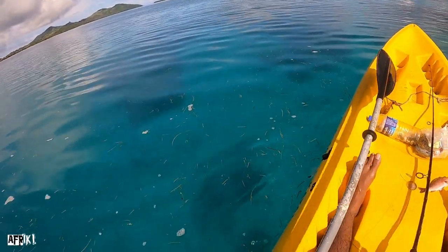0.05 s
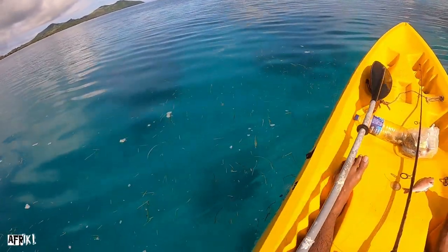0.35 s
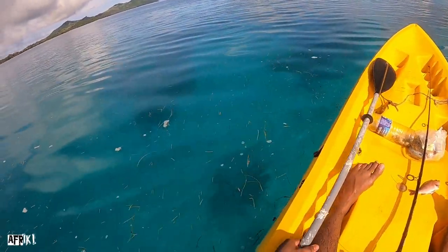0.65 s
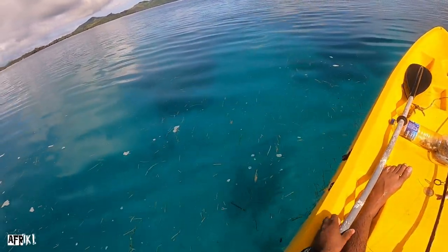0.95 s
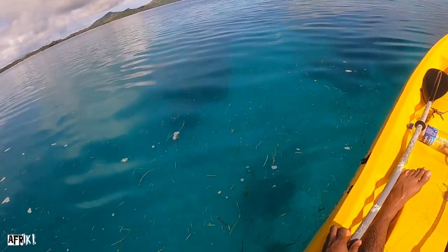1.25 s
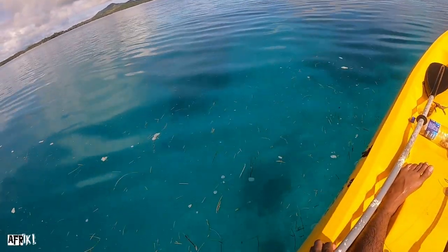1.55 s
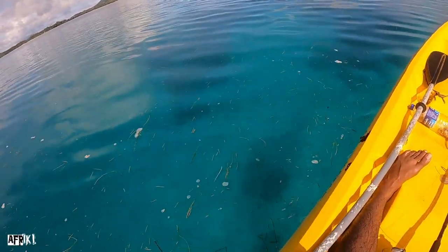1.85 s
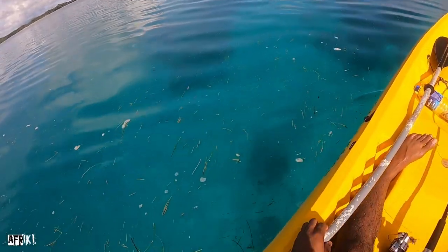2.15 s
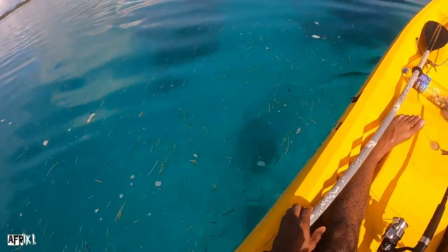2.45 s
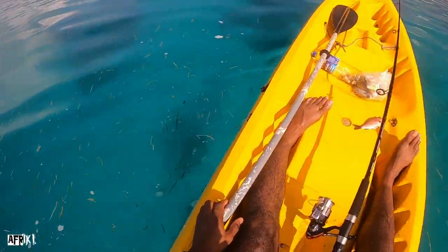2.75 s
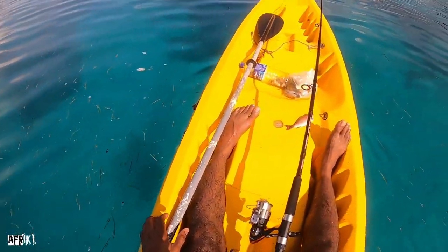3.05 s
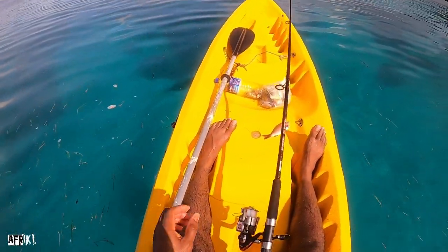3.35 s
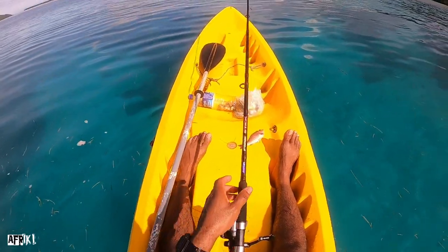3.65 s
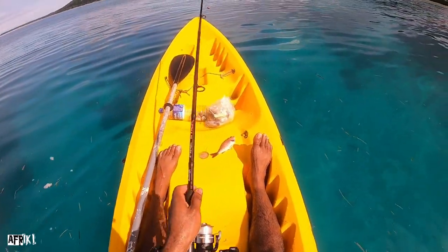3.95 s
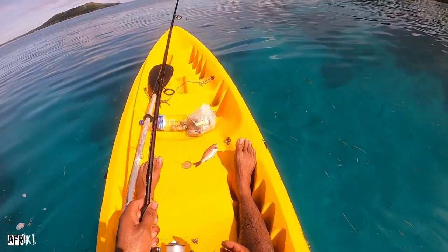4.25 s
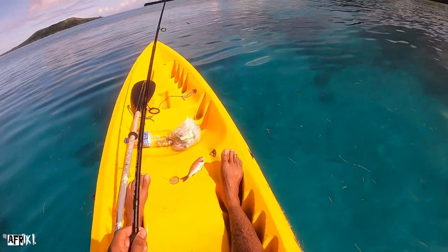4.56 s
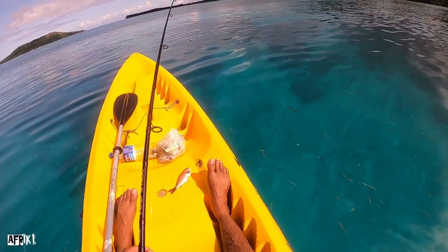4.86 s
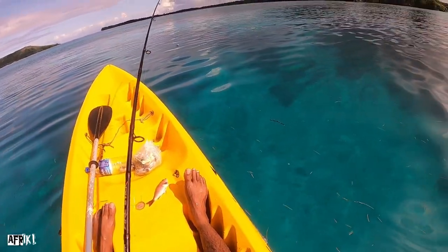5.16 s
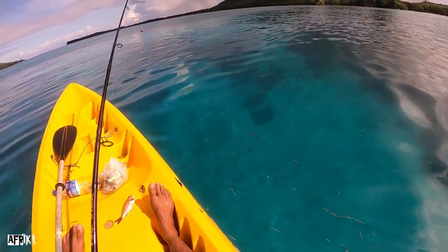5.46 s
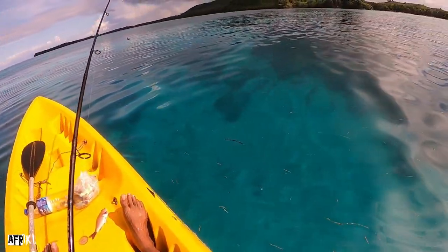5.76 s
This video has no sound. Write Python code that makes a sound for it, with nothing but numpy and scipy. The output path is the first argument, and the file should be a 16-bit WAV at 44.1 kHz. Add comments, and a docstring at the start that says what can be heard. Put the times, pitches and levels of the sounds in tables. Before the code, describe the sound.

A paddle thumps and scrapes on a hollow plastic kayak, then a fishing rod is handled with light clicks over a faint hum.

```python
"""Hollow thumps, scrapes and clicks: a paddle is laid down in a plastic kayak, then a rod is picked up.
Blows make the hull ring, and the paddle catches and slips as it slides. Small ticks, rustle and clinks
of the fishing reel follow, over a faint far hum and light air on calm water.
A worn action camera hears it all. Its right port (microphone opening) honks near 750 Hz and loses
the treble, as a wet port does."""
import sys
import numpy as np
from scipy import signal
from scipy.fft import rfft, irfft, next_fast_len
from scipy.io import wavfile

SR = 44100
rng = np.random.default_rng(int(sys.argv[2]) if len(sys.argv) > 2 else 0)


def dump(signal):
    """Clip the signal to [-1, 1] and save it as 16-bit WAV at the path in sys.argv[1]."""
    limited = np.clip(np.atleast_2d(signal).T, -1, 1)
    pcm = np.round(limited * 32767).astype(np.int16)
    wavfile.write(sys.argv[1], SR, pcm)


N = 260190
T = np.arange(N) / SR

# The hull's modes, the tones it rings with when struck.
# Each row: pitch in Hz, level in dB, t60 (the time to fade by 60 dB) in seconds.
HULL_MODES = [(45.5, 4.5, 1), (61.05, 0, 0.49), (85.8, -5, 0.41), (99.3, -2, 0.31), (128.5, -6, 0.32),
              (155.5, -5.5, 0.16), (189, -5, 0.095), (228.2, -2.5, 0.088), (262.5, -15.5, 0.25),
              (310.5, -11.5, 0.21), (342.5, -11.5, 0.13), (411.4, -7.5, 0.073), (528, -0.5, 0.042),
              (599, -2.5, 0.068), (673.4, -8, 0.1), (795, -3.5, 0.08), (858, -4, 0.078), (997, -4.5, 0.061),
              (1240, -11.5, 0.082), (1770, -2, 0.035)]
# The tone of rubbing. Each row: frequency in Hz, then level in dB for scrape, judder and rustle.
RUBBING_TONE = [(30, 10.5, -5, -4.5), (74.6, 8.5, -8.5, -13.5), (158, 1.5, 6, -7), (316, -0.5, -3, 6),
                (550, -2, -3, -0.5), (920, -9.5, -27, 2.5), (1730, -14.5, -38, 3), (3230, -21.5, -38, -8),
                (4280, -26.5, -49.5, -12.5), (6740, -39.5, -67, -17.5), (10400, -50.5, -55, -34),
                (16000, -72, -83.5, -50)]
# Movements of hands, clothes and line.
# Each row: start in seconds, length in seconds, level in dB, growth along the way in dB.
HAND_MOVES = [(.01, 0.0063, -43, -15.5), (.27, 0.15, -49, -19.5), (.54, 0.061, -36, 2.5),
              (.76, 0.065, -40, 1.5), (1.81, 0.06, -46.5, -1.5), (1.93, 0.21, -48.5, 5),
              (2.87, 0.18, -48.5, -4), (3.23, 0.024, -42.5, 8.5), (3.56, 0.018, -45, 3.5),
              (3.68, 0.64, -46, 1.5), (3.965, 0.05, -39.5, -0.5), (4.16, 0.092, -42, -5),
              (4.41, 0.0085, -44, 2.5), (4.59, 0.18, -48.5, -2.5), (5.03, 0.2, -45.5, 4),
              (5.4, 0.065, -41.5, -4), (5.5, 0.071, -46, 5), (5.64, 0.044, -42.5, 2.5),
              (5.8, 0.092, -50.5, 8)]


def amp(db):
    """Turn decibels into a gain."""
    return 10 ** (np.asarray(db) / 20)


def unit(x):
    """Scale a sound so that its average level (rms) is 1."""
    return x / np.sqrt(np.mean(x ** 2) + 1e-20)


def unit_hit(x):
    """Scale a hit so that its first 10 ms have an average level of 1."""
    return x / np.sqrt(np.mean(x[:SR // 100] ** 2) + 1e-20)


def on_octaves(hz, points_hz, values):
    """Join points by straight lines, with every octave equally wide."""
    return np.interp(np.log(np.maximum(hz, 1)), np.log(points_hz), values)


def colour(x, points, size=2048):
    """Shape a sound's tone to follow an outline of (Hz, dB) points."""
    db = on_octaves(np.arange(size // 2 + 1) * SR / size, *np.transpose(points))
    cepstrum = irfft(np.log(amp(db)))
    cepstrum[1:size // 2] *= 2  # folded so that the filter rings only after a hit, never before
    cepstrum[size // 2 + 1:] = 0
    return signal.fftconvolve(x, irfft(np.exp(rfft(cepstrum))))[:len(x)]


def resonant(hz, db, peaks):
    """A tone outline with peaks added. Each peak: pitch in Hz, width in Hz, height in dB."""
    fine_hz = np.geomspace(30, 16000, 600)
    lift = sum(height / (1 + (2 * (fine_hz - f) / width) ** 2) for f, width, height in peaks)
    return np.c_[fine_hz, on_octaves(fine_hz, hz, db) + lift]


def band(hz, width_hz):
    """Noise gathered around one pitch."""
    offset = (np.arange(N // 2 + 1) * SR / N - hz) / width_hz
    return unit(irfft(rfft(rng.standard_normal(N)) / (1 + (2 * offset) ** 2), N))


def waver(spread_db, rate_hz):
    """A gain that wanders up and down at random."""
    return amp(spread_db * band(0, rate_hz))


def fade(t60, count):
    """A gain, count samples long, that falls by 60 dB every t60 seconds."""
    return np.exp(-np.log(1000) * T[:count] / t60)


def burst(t60, count):
    """Noise that starts at once and dies away."""
    return rng.standard_normal(count) * fade(t60, count)


def ring(hz, db, t60, count):
    """The fading tones of a struck object, added together."""
    return sum(amp(level) * fade(life, count) * np.sin(2 * np.pi * f * T[:count])
               for f, level, life in zip(hz, db, t60))


def add(out, start_s, sound):
    """Mix a sound in at the given time."""
    start = max(int(start_s * SR), 0)
    out[start:start + len(sound)] += sound[:max(N - start, 0)]


def slips(per_second, spread_db):
    """Surfaces stick and slip, giving uneven pulses at random moments."""
    size = amp(spread_db * np.clip(rng.standard_normal(N), -2, 2))
    return unit((rng.random(N) < per_second / SR) * size * rng.choice([-1, 1], N))


def stroke(start_s, length_s, attack_s, release_s, growth_db=0):
    """The gain of one movement: it builds up to start_s, holds while growing or easing, then fades."""
    progress = np.clip((T - start_s) / max(length_s, 1e-3), 0, 1)
    before = np.maximum(start_s - T, 0) / attack_s
    after = np.maximum(T - start_s - length_s, 0) / release_s
    return amp(growth_db * (progress - .5)) * np.exp(-before - after)


def strokes(rows, attack_s, release_s):
    """The gain of a whole table of movements."""
    return np.sqrt(sum((amp(db) * stroke(start_s, length_s, attack_s, release_s, growth_db)) ** 2
                       for start_s, length_s, db, growth_db in rows))


def rod_in_hand():
    """A gain that rises as the rod is picked up and stays up to the end."""
    return stroke(start_s=3.33, length_s=N / SR, attack_s=0.17, release_s=.2)


def hum_and_air(air_db=-42.5):
    """A wavering low hum carries across the water under soft air noise."""
    # The far hum. Each row: pitch in Hz, width in Hz, level in dB.
    hum_bands = [(144, 19.7, -46.5), (187.3, 18, -48.5), (225.8, 3, -50), (276.6, 12.6, -47.5)]
    # The tone of open air. Each row: frequency in Hz, level in dB.
    air_tone = [(25, 13.5), (80, -9), (150, -0.5), (320, 0), (500, -12.5), (1000, -16), (2500, -20),
                (5000, -28.5), (8000, -39), (12000, -52.5), (16000, -64.5)]
    hum = sum(amp(db) * band(hz, width_hz) for hz, width_hz, db in hum_bands)
    air = unit(colour(rng.standard_normal(N), air_tone)) * waver(spread_db=2, rate_hz=3.6)
    return hum + amp(air_db) * air


def breeze(shared=0.63, attack_s=0.017, release_s=0.031):
    """Puffs of air rumble on the two ports as the head turns, partly alike on both sides."""
    # Each row: start in seconds, length in seconds, left level in dB, right level in dB.
    puffs = [(0.026, 0.13, -15.5, -38), (0.524, 0.69, -42, -43), (1.193, 0.13, -41, -39),
             (1.46, 0.077, -38, -48), (2.06, 0.052, -36, -46), (2.574, 0.3, -30, -30.5),
             (3.216, 0.01, -49, -33.5), (3.418, 0.013, -31, -43), (3.607, 0.029, -39.5, -58),
             (3.882, 0.019, -31.5, -39), (4.004, 0.017, -42, -18), (4.106, 0.008, -36, -26),
             (4.195, .015, -49, -19), (4.595, 0.016, -38, -26), (4.728, 0.016, -54, -34),
             (5.152, 0.12, -38, -37), (5.36, 0.017, -30, -22.5), (5.636, 0.32, -35.5, -27.5)]
    rumble_tone = [(12, -8), (32, 10), (60, -1), (100, -10), (200, -19.5), (600, -83.5)]
    common, left, right = (unit(colour(rng.standard_normal(N), rumble_tone)) for _ in range(3))
    gusts = sum(amp([[left_db], [right_db]]) * stroke(start_s, length_s, attack_s, release_s)
                for start_s, length_s, left_db, right_db in puffs)
    return np.array([unit(left + shared * common), unit(right + shared * common)]) * gusts


def rustle(idle_db=-54):
    """Hands, clothes and line rub in fine slips that never quite stop once the rod is held."""
    hz, _, _, rustle_db = np.transpose(RUBBING_TONE)
    fibres = slips(per_second=5000, spread_db=3) * waver(spread_db=2.2, rate_hz=44)
    moving = strokes(HAND_MOVES, attack_s=0.048, release_s=0.03)
    return unit(colour(fibres, np.c_[hz, rustle_db])) * np.hypot(moving, amp(idle_db) * rod_in_hand())


def crackles(moving_db=-11, idle_db=-62.5):
    """Line, reel and rod give dry crackles in uneven bunches, stronger while the hands move."""
    out = np.zeros(N)
    for when, pitch, force in rng.random((520, 3)):
        hz = 1700 * 4 ** pitch
        tone = [(500, -16), (hz / 1.5, -7), (hz, 0), (8000, -15), (11000, -33), (16000, -54)]
        click = colour(burst(t60=.014, count=1200), tone, size=256)
        add(out, when * N / SR, amp(12 * force ** 2) * click)
    moving = amp(moving_db) * strokes(HAND_MOVES, attack_s=0.093, release_s=0.042)
    handling = np.hypot(moving, amp(idle_db) * rod_in_hand())
    return unit(out * waver(spread_db=3, rate_hz=14)) * handling


def reel_clinks(chatter_t60=0.008, count=4000):
    """Loose metal parts of the reel chatter for a moment and ring briefly."""
    # Each row: start in seconds, level in dB.
    clinks = [(5.403, -35.5), (5.412, -38), (5.43, -46.5), (5.448, -49), (5.468, -67.5), (5.56, -50),
              (5.594, -52), (5.631, -46.5), (5.68, -45.5)]
    # The reel's ring. Each row: pitch in Hz, level in dB, fade time in seconds.
    reel_modes = [(2100, -1, 0.022), (3150, 3, 0.0185), (3750, 4, .014), (4050, 9, 0.022), (4380, -3, 0.02),
                  (4800, -2, 0.025), (5800, -11, 0.017), (7060, -6, 0.02), (8800, -25, .012)]
    out = np.zeros(N)
    metal = ring(*np.transpose(reel_modes), count)
    for start_s, level_db in clinks:
        clink = signal.fftconvolve(burst(chatter_t60, count), metal)
        add(out, start_s, amp(level_db) * unit_hit(clink))
    return out


def ticks(click_t60=0.03, rise_s=0.00074, ring_cycles=27, count=3500):
    """Blade, rod and line tap lightly: a click and four short tones, of which the lowest lasts longest."""
    # Each row: start in seconds, click in dB, ring in dB, pitch in Hz, brightness in dB per octave.
    taps = [(.344, -41, -43, 2150, 3), (.409, -40.5, -41.5, 2260, -0.5), (.602, -42.5, -20.5, 894, 2.5),
            (.626, -33.5, -25.5, 870, -4.5), (.7415, -31.5, -33, 2760, 6), (0.7737, -34.5, -26, 1440, 2),
            (0.7891, -36, -18.5, 1096, -12), (.829, -36.5, -24, 1240, -5.5), (0.868, -57, -24, 1285, -6),
            (.946, -39, -20, 1680, 4), (1.005, -46.5, -21.5, 870, -3.5), (1.021, -39, -18.5, 823, -1),
            (1.062, -40.5, -34, 890, -2.5), (1.551, -38, -32.5, 2550, -5), (1.841, -46.5, -42, 2470, -2),
            (1.849, -46, -47.5, 3400, 10.5), (1.996, -49.5, -53, 2720, 2.5), (2.425, -61, -40, 1270, -8),
            (2.456, -53.5, -41.5, 1180, 9.5), (2.597, -50.5, -49, 3500, 2),
            (2.642, -45.5, -36.5, 2470, 4.5), (2.887, -55.5, -33.5, 1260, 9), (3.008, -38, -48.5, 1560, 0),
            (3.182, -44.5, -52, 2730, 7.5), (3.517, -42.5, -31.5, 630, 6.5), (3.543, -39, -37.5, 3280, -1),
            (3.694, -36, -32, 3100, 1.5), (3.705, -37.5, -39.5, 2160, 2), (3.78, -35, -37, 1610, 0.5),
            (3.843, -51, -48, 3020, 1.5), (3.864, -37, -33, 2990, -1.5), (3.908, -52, -53, 1690, 12),
            (3.935, -49, -54, 1540, 4.5), (3.947, -37.5, -45, 1580, 1.5), (4.024, -36.5, -29.5, 1990, 7),
            (4.139, -42.5, -41, 1850, 1), (4.19, -30, -41.5, 1580, -5.5), (4.231, -39, -49, 1790, 0.5),
            (4.427, -42.5, -41, 1830, -1.5), (4.632, -48.5, -47, 1700, 6), (4.679, -41, -40, 1260, 2.5),
            (4.722, -45, -47, 1830, -4), (4.734, -35, -50, 2770, 2), (4.796, -44.5, -45, 1690, 2.5),
            (4.909, -43, -36.5, 1870, 0), (5.015, -52, -45, 1930, 8), (5.032, -38, -45.5, 1570, -3),
            (5.065, -46, -54, 1830, -3), (5.18, -34, -44.5, 1870, -9.5), (5.224, -53.5, -49, 7200, 4),
            (5.251, -38.5, -31.5, 1880, -5.5), (5.391, -48.5, -37, 1820, -7), (5.409, -31, -42, 1500, -0.5),
            (5.494, -40, -47, 1960, -3), (5.531, -48, -46.5, 1520, 8), (5.55, -40, -44, 3230, 7),
            (5.645, -36.5, -36, 2000, 7.5), (5.658, -39, -40, 2940, 4), (5.678, -47, -42, 1930, 9)]
    tone_hz, tone_db = np.transpose([(200, -9), (900, 17), (3000, 12.5), (7500, -5.5),
                                     (11000, -28), (16000, -37)])
    rise = 1 - np.exp(-T[:count] / rise_s)
    out = np.zeros(N)
    for start_s, click_db, ring_db, hz, brightness in taps:
        tone = np.c_[tone_hz, tone_db + brightness * np.log2(tone_hz / 2000)]
        click = colour(burst(click_t60, count), tone)
        mode_hz = hz * np.array([1, 1.13, 1.41, 1.73])
        ringing = rise * ring(mode_hz, [4.5, -3.5, -6, -7.5], ring_cycles / mode_hz, count)
        add(out, start_s, amp(click_db) * unit_hit(click) + amp(ring_db) * unit_hit(ringing))
    return out


def scratches(low_hz=998, high_hz=3140, ring_cycles=37):
    """A hard edge bites into the plastic and tears along in tiny grains, each with its own pitch."""
    # Each row: start in seconds, length in seconds, level in dB, growth along the way in dB.
    bites = [(.488, 0.017, -24.5, 0.5), (.532, 0.044, -25, -2), (.56, 0.078, -31.5, -1),
             (.741, 0.0033, -25.5, 3), (.83, 0.23, -43, -11), (.928, 0.016, -32.5, 0),
             (1.55, .06, -41.5, -18), (2.042, 0.033, -49.5, 10), (2.1, 0.045, -39, 1.5),
             (2.45, 0.34, -54, -7)]
    grains = np.zeros(N)
    for when, pitch, force in rng.random((3200, 3)):
        hz = low_hz * (high_hz / low_hz) ** pitch
        add(grains, when * N / SR, ring([hz], [force ** 2], [ring_cycles / hz], count=500))
    tone = [(300, -19.5), (1000, 0.5), (7500, 1), (10000, -5.5), (16000, -19)]
    return unit(colour(grains, tone)) * strokes(bites, attack_s=0.0011, release_s=0.0021)


def scrapes():
    """The paddle slides along the rim, catching and letting go in fast slips that make both ring."""
    # Each row: start in seconds, length in seconds, level in dB, growth along the way in dB.
    slides = [(.01, 0.043, -32, 0.5), (.12, 0.12, -39, 6), (.492, 0.005, -22, -4.5),
              (.534, 0.088, -22.5, -3), (.743, 0.016, -25, -6), (.838, 0.17, -30.5, -6.5),
              (.955, 0.079, -25, -7), (1.06, 0.056, -39.5, 8.5), (1.36, 0.24, -37.5, -1.5),
              (1.55, 0.14, -34.5, -18.5), (2.03, 0.12, -25.5, 9), (2.19, 0.023, -35, 9)]
    # Where blade and rim ring. Each row: pitch in Hz, width in Hz, height in dB.
    blade_peaks = [(348, 130, 4.5), (650, 64, -0.5), (875, 97, 8.5), (1250, 9.6, 11), (1673, 110, 9),
                   (2340, 44, 16.5), (2750, 240, 6.5), (2996, 180, 6.5)]
    hz, scrape_db, _, _ = np.transpose(RUBBING_TONE)
    grit = slips(per_second=2400, spread_db=2.5) * waver(spread_db=1, rate_hz=28)
    scraping = unit(colour(grit, resonant(hz, scrape_db, blade_peaks)))
    return scraping * strokes(slides, attack_s=0.0056, release_s=0.028)


def judders(peak_width_hz=10.7, peak_db=11):
    """A leaning hand shoves the shaft over the deck; slow, heavy slips shake the hull."""
    # Each row: start in seconds, length in seconds, level in dB, growth along the way in dB.
    shoves = [(2.41, 0.13, -29, -8), (2.53, 0.12, -23.5, 0), (2.69, 0.11, -26, 1.5),
              (3.29, 0.064, -35.5, 1)]
    hz, _, judder_db, _ = np.transpose(RUBBING_TONE)
    deck_peaks = [(f, peak_width_hz, peak_db) for f, _, _ in HULL_MODES]  # damped by the hand
    jolts = slips(per_second=490, spread_db=3)
    juddering = unit(colour(jolts, resonant(hz, judder_db, deck_peaks), size=8192))
    return juddering * strokes(shoves, attack_s=0.012, release_s=0.014)


def shaft_snaps(crack_db=-5.5, crack_t60=.005, rattle_db=0.5, rattle_t60=0.021,
                thud_db=-32, thud_t60=0.05, count=4000):
    """The paddle shaft hits a fitting: it cracks, rings briefly, rattles and taps the hull below."""
    # Each row: start in seconds, level in dB, brightness in dB per octave.
    snaps = [(1.3371, -15, -1), (1.4690, -22.5, -5.5), (2.1653, -10, 12), (2.301, -35, 1.5)]
    # The stiff shaft's ring. Each row: pitch in Hz, level in dB, fade time in seconds.
    shaft_modes = [(1190, -25, 0.047), (1550, 6.5, 0.033), (1840, 5.5, 0.03), (2220, 7, 0.027),
                   (2560, 0.5, 0.015), (2860, 0.5, 0.015), (3430, -0.5, 0.012), (3930, 3.5, 0.010),
                   (5680, 0.5, 0.015), (6600, -6.5, 0.009), (7300, -5.5, 0.008), (8430, -10, 0.0073),
                   (9500, -13.5, 0.008), (11870, -26.5, 0.009)]
    hz, db, t60 = np.transpose(shaft_modes)
    hull_hz, hull_db, hull_t60 = np.transpose(HULL_MODES)
    bass_cut_db = 6 * np.log2(np.minimum(hull_hz / 600, 1))
    thud = unit_hit(ring(hull_hz, hull_db + bass_cut_db, hull_t60, count) * fade(thud_t60, count))
    rattle_tone = [(500, -23.5), (1400, 2.5), (3000, 12.5), (4500, -13), (7000, -12.5),
                   (12000, -22), (15000, -35.5)]
    out = np.zeros(N)
    for start_s, level_db, brightness in snaps:
        gripped_hz = hz * (1 + 0.037 * rng.standard_normal(len(hz)))  # the grip shifts the ring a little
        ringing = unit_hit(ring(gripped_hz, db + brightness * np.log2(hz / hz[0]), t60, count))
        crack_tone = [(600, -21), (1200, -13.5), (2000, 9.5), (4500, 19.5 + brightness),
                      (7500, 4 + brightness), (11000, -5 + brightness), (15000, -15.5 + 2 * brightness)]
        crack = unit_hit(colour(burst(crack_t60, count), crack_tone))
        chatter = burst(rattle_t60, count) * (rng.random(count) < .1)
        rattle = unit_hit(colour(chatter, rattle_tone))
        snap = unit_hit(ringing + amp(crack_db) * crack + amp(rattle_db) * rattle)
        add(out, start_s, amp(level_db) * (snap + amp(thud_db) * thud))
    return out


def hull_heaves(rise_s=0.0045, settle_t60=1.45, db_per_octave=-32, count=26000):
    """The paddle's weight lands and the shell heaves; so slow a push stirs only modes near its pitch."""
    # Each row: start in seconds, level in dB, the pitch that the push favours in Hz.
    pushes = [(0.109, -13.5, 144), (.49, -11.5, 62.5), (0.601, -13, 57.3), (0.74, -9.5, 61),
              (0.945, -6.5, 58.4), (1.062, -14.5, 61.4), (2.579, -12, 95), (2.69, -14, 70)]
    hz, db, t60 = np.transpose(HULL_MODES)
    swell = (1 - np.exp(-T[:count] / rise_s)) * fade(settle_t60, count)
    out = np.zeros(N)
    for start_s, level_db, push_hz in pushes:
        octaves_away = np.abs(np.log2(hz / push_hz))
        add(out, start_s, swell * ring(hz, level_db + db + db_per_octave * octaves_away, t60, count))
    return out


def blow_db(hz, spot_hz, hardness, panel_hz=247, contact_hz=1640):
    """How hard a blow drives each frequency: a stiff spot gives little bass, a soft hit little treble."""
    knee_hz = np.clip(spot_hz, panel_hz, contact_hz)
    bass_db = 20 * np.log2(np.minimum(hz / spot_hz, 1))
    treble_db = hardness * np.log2(np.clip(hz, knee_hz, contact_hz) / knee_hz)
    return bass_db + treble_db


def hull_knocks(boom_t60=0.075, wall_t60=0.037, contact_db=11, rise_cycles=0.64, count=26000):
    """Each blow rings the whole hull, makes the struck panel boom and sends a noisy smack into the wall."""
    # Each row: start in seconds, strength in dB, pitch of the struck panel in Hz,
    # hardness of the contact in dB per octave, boom of that panel in dB.
    blows = [(.037, -30.5, 55, -0.5, -17), (.069, -11, 113.3, -48, -7.5), (.109, -11, 107, -4, 8),
             (.153, -17.5, 144, -3, 2.5), (0.203, -15, 98, -6.5, -7), (.236, -22, 78, -2.5, -12),
             (.486, -28, 153, 2, -1.5), (.544, -23.5, 355.4, -2, 5.5), (0.584, -21.5, 131, -5, -5),
             (.603, -22.5, 328, -12, -1), (.625, -31, 413, -0.5, -17), (.7395, -18.5, 78.4, 1.5, -7.5),
             (.752, -13.5, 115, -16, 0.5), (.774, -22, 98, -0.5, 3), (.789, -21.5, 131, 0.5, -2),
             (0.828, -19, 86.4, -2.5, -0.5), (.869, -23, 63.5, -6, -15), (.944, -14, 89, -6, -1),
             (1.005, -20, 97, -15.5, -4.5), (1.02, -7.5, 123.5, -6.5, -6.5), (1.042, -14, 133.4, -9.5, -5),
             (1.067, -21.5, 674, -7, -22.5), (1.163, -23.5, 145, -6.5, -14), (1.513, -26, 137.5, -4.5, -9),
             (1.55, -26.5, 157.5, -0.5, -4), (2.107, -24, 244, -4.5, -2), (2.124, -26, 585, -7.5, -10.5),
             (2.155, -23.5, 610, -13.5, -10), (2.3, -25.5, 240, -4, -11.5), (2.424, -8.5, 322, -14, -15),
             (2.546, -22, 200, -24, -2), (2.573, -13.5, 235, -8.5, -5), (2.606, -19.5, 150.5, -20.5, 1),
             (2.643, -20, 215, -13.5, -3.5), (2.682, -16, 157.5, -9, -2.5),
             (2.703, -20.5, 197, -11.5, -15.5), (2.732, -7.5, 302, -10, -17.5),
             (2.766, -22.5, 171, -11.5, -2), (2.792, -24, 227, -10, -3.5),
             (2.835, -9.5, 184.3, -14.5, -3.5), (2.886, -25.5, 217, -2, -8.5),
             (2.924, -22, 212, -11.5, -5.5), (2.994, -22, 248, -18.5, -7.5), (3.073, -28, 158, -11, 3),
             (3.211, -34, 131, -10, -16.5), (3.243, -23.5, 259, -16.5, -12), (3.279, -8.5, 236, -7, -9),
             (3.517, -32.5, 329, 1.5, -18), (3.951, -31, 734, -13, -15), (4.157, -21, 283, -14.5, -14.5),
             (4.192, -28, 99.5, -1, -11), (4.232, -31, 714, -18.5, -16), (4.533, -36.5, 254, -1.5, -11.5),
             (5.126, -27, 167, -10.5, -14.5), (5.643, -38, 262, 3.5, -18)]
    # The tone of the wall's many crowded modes. Each row: frequency in Hz, level in dB.
    wall_tone = [(100, -5.5), (300, 15.5), (700, 8), (1000, 4.5), (1300, 8.5), (2000, 6), (3000, -1),
                 (4500, -12.5), (7500, -38.5), (11000, -40.5), (16000, -55.5)]
    hz, db, t60 = np.transpose(HULL_MODES)
    wall_hz, wall_db = np.transpose(wall_tone)
    signs = np.where(hz < 330, 1, (-1) ** np.arange(len(hz)))  # low modes start in the same direction
    out = np.zeros(N)
    for start_s, strength_db, spot_hz, hardness, boom_db in blows:
        # every spot favours other upper modes
        pitch_shift, level_shift = rng.standard_normal((2, len(hz))) * np.minimum(hz / 400, 1)
        mode_hz = hz * (1 + 0.029 * pitch_shift)
        mode_db = db + strength_db + blow_db(hz, spot_hz, hardness) + 1.5 * level_shift
        for f, level, life, sign in zip(mode_hz, mode_db, t60, signs):
            rise = 1 - np.exp(-T[:count] * f / rise_cycles)  # the big panels take longest to swing
            add(out, start_s, sign * rise * ring([f], [level], [life], count))
        boom = ring([spot_hz, spot_hz * 1.46], [0, -1], [boom_t60] * 2, count)
        boom_rise = 1 - np.exp(-T[:count] * spot_hz / rise_cycles)
        add(out, start_s, amp(strength_db + boom_db) * boom * boom_rise)
        smack = burst(wall_t60, count // 4)
        smack[0] = amp(contact_db)  # the first contact arrives whole, then spreads through the wall
        smack_tone = np.c_[wall_hz, wall_db + blow_db(wall_hz, spot_hz, hardness)]
        add(out, start_s, amp(strength_db) * colour(unit_hit(smack), smack_tone))
    return out


def deck_echoes(x, echo_db=-20):
    """Deck and legs throw back a brief scatter of echoes, different on every call."""
    echoes = colour(burst(t60=0.0084, count=2000), [(3000, -3), (6000, -3), (12000, -15.5)])
    return x + amp(echo_db) * signal.fftconvolve(x, echoes / np.linalg.norm(echoes))[:N]


def right_port(x):
    """Like a wet port, the right one honks near 750 Hz, lags above that and muffles the treble."""
    # The right port against the left. Each row: frequency in Hz, gain in dB, lag in radians.
    port_response = [(30, 0, 0.41), (204, -1.5, 0.18), (396, 1, 0.28), (521, 2, 0.55), (675, 12, 1.24),
                     (750.3, 19, 3.2), (771.6, 12, 3.72), (901, 6, 3.79), (1120, 4, 4.155),
                     (1880, -4.5, 4.62), (3160, -8.5, 4.55), (3800, -11, 5.4), (6260, -18, 4.6),
                     (16700, -23, 16)]
    hz, db, lag = np.transpose(port_response)
    size = next_fast_len(N + 4096)
    bin_hz = np.arange(size // 2 + 1) * SR / size
    response = amp(on_octaves(bin_hz, hz, db)) * np.exp(-1j * on_octaves(bin_hz, hz, lag))
    return irfft(rfft(x, size) * response, size)[:N]


def scene():
    """Every sound reaches both ports with its echoes, and the breeze rumbles on top."""
    hits = hull_knocks() + hull_heaves() + shaft_snaps() + ticks() + reel_clinks()
    rubbing = scrapes() + judders() + rustle() + scratches() + crackles()
    sound = hits + rubbing + hum_and_air()
    left = deck_echoes(sound)
    right = right_port(deck_echoes(sound))
    return np.array([left, right]) + breeze()


def record(dry, low_hz=14, top_hz=16000):
    """The camera blocks the slowest swings, flattens the highest peaks and cuts the top treble."""
    low_cut = signal.butter(1, low_hz, "high", fs=SR, output="sos")
    top_cut = signal.ellip(8, .2, 70, top_hz, fs=SR, output="sos")
    clipped = np.clip(signal.sosfilt(low_cut, dry), -1, 1)
    return signal.sosfilt(top_cut, clipped)


dry = scene()
out = record(dry)
dump(out)
```